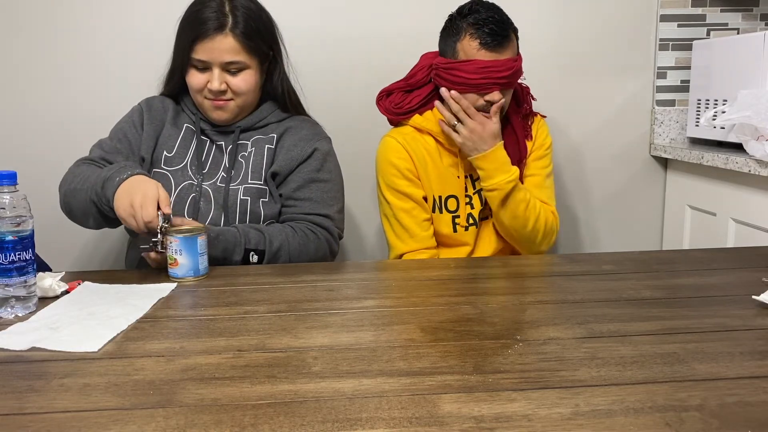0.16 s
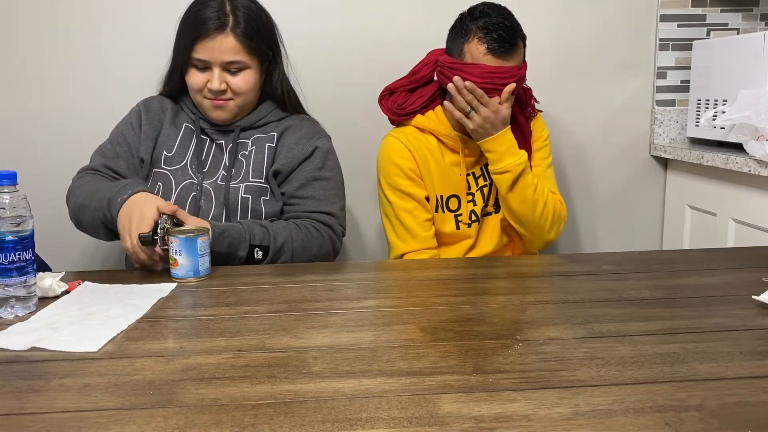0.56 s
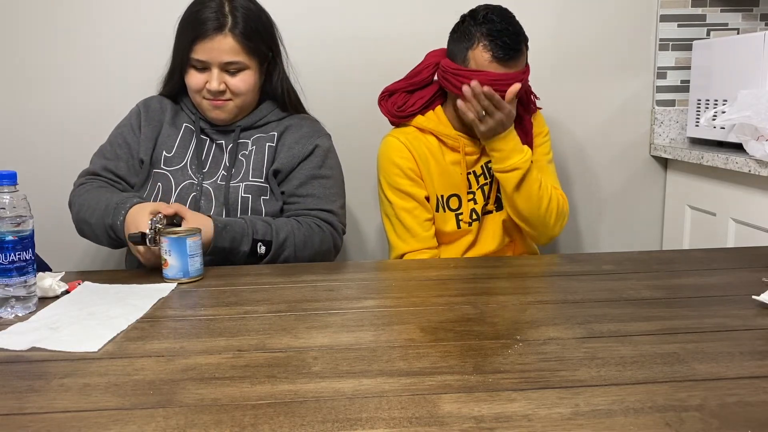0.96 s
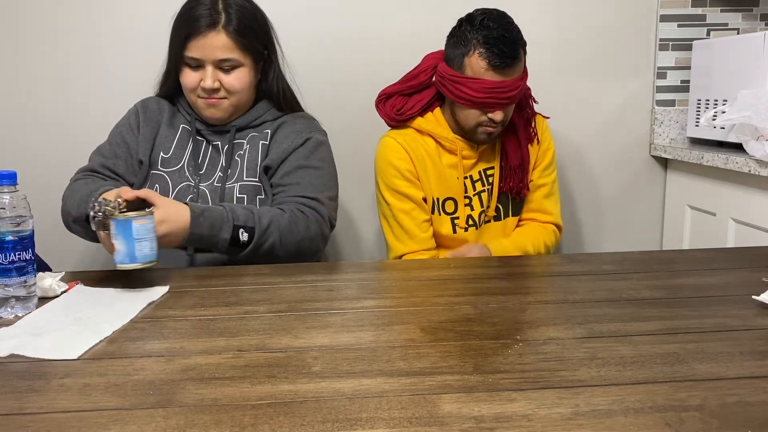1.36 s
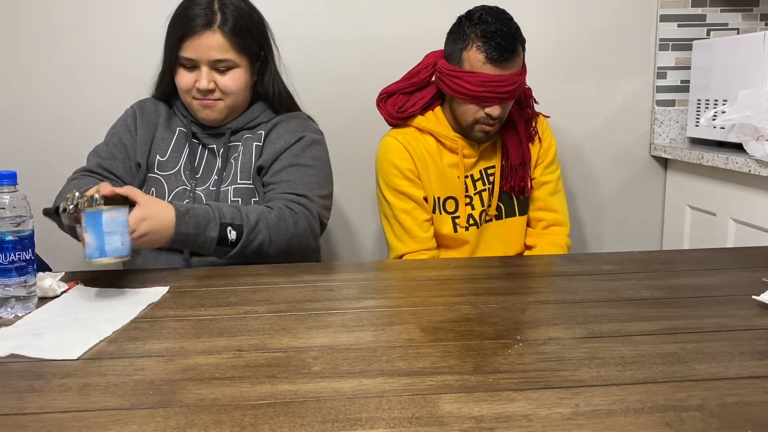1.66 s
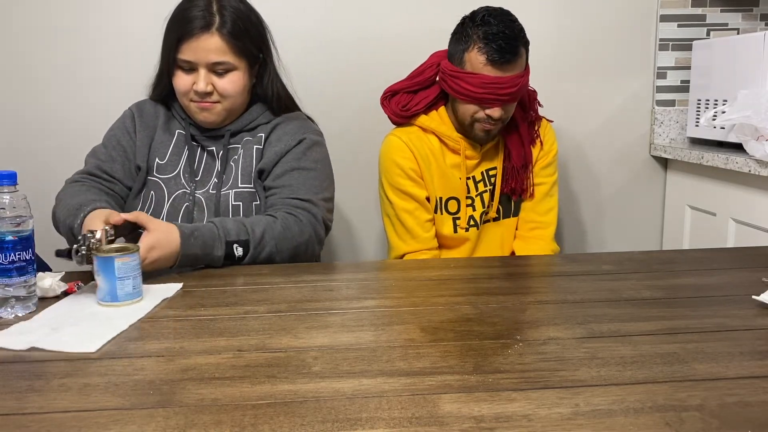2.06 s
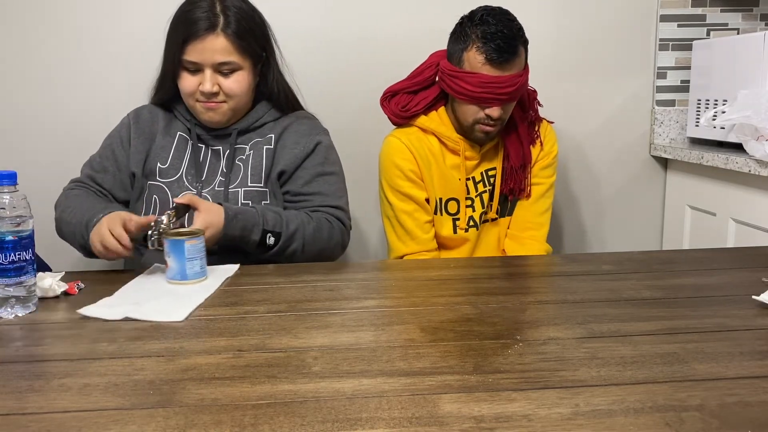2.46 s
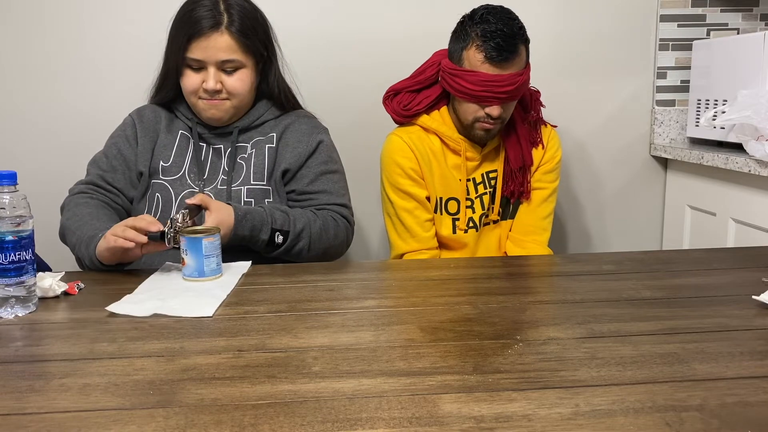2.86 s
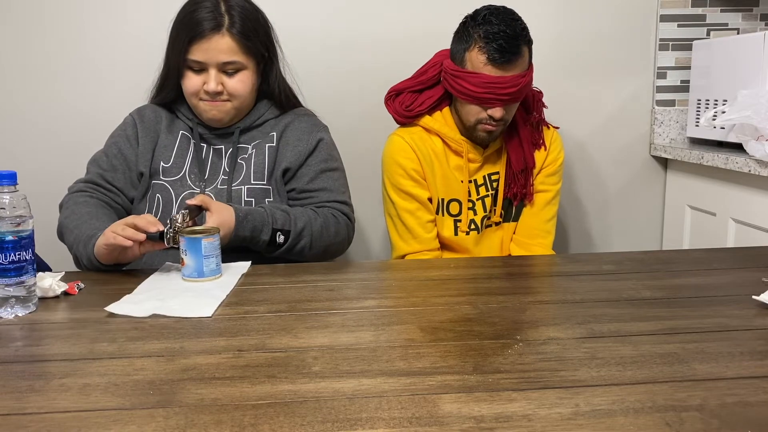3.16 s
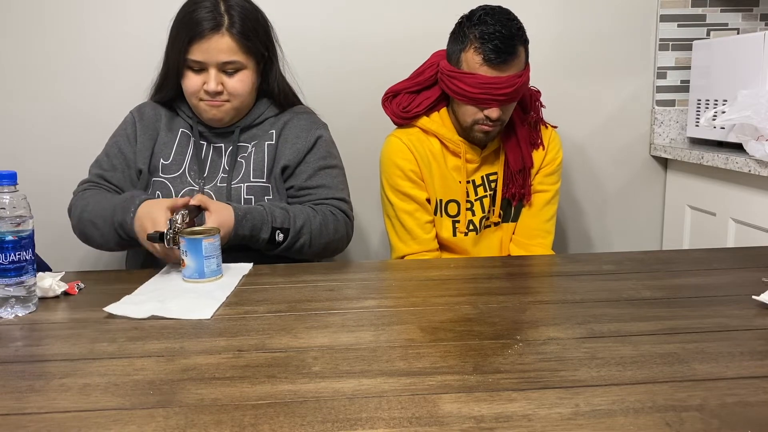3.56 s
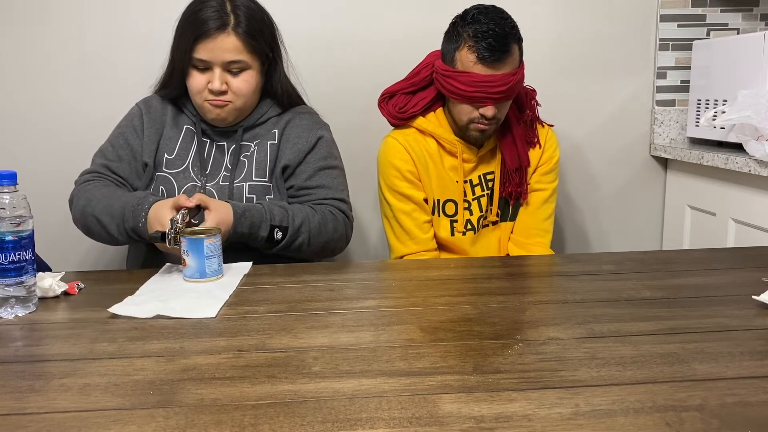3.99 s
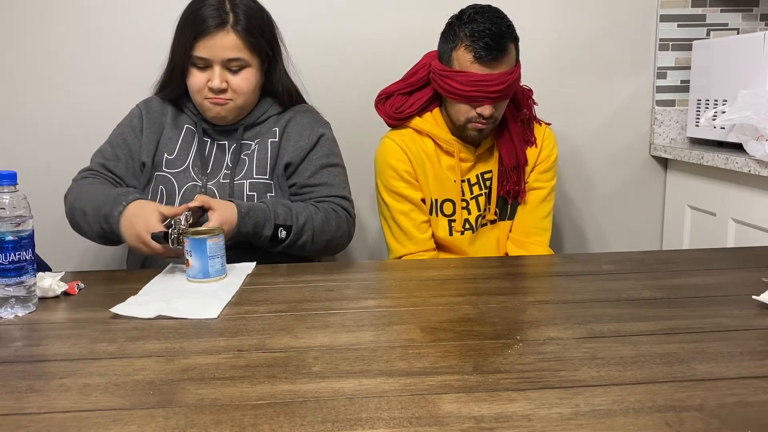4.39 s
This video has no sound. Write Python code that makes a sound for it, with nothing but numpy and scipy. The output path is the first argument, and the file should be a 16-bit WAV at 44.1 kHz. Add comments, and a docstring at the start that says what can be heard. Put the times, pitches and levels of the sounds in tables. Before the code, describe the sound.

A hard-walled kitchen, heard in stereo by a phone across a wooden table, has a steady low appliance hum near 120 Hz and soft bassy room noise. At 0 to 0.05 s a metallic clunk and dull shuffle come from left of centre; weaker wooden knocks follow at 0.3, 0.45 and 0.57 s, with brief hand rubbing. Around 1.2 to 1.55 s paper and hands rustle brightly. Tiny ticks at 1.6 to 1.77 s precede a heavy, low thud of the tin on the table at 1.88 to 1.92 s, several contacts run together. Soft sliding continues to 2.7 s, with small dry ticks at 2.34 and 2.7 s, then near quiet. Faint ticks come at 3.35 s, crisp little clicks at 3.53 to 3.58 s, and a soft deep push at 3.63 s. At 4.09 s the loudest metallic snap cracks, knocks the wood and rings briefly with kitchen echoes. Light handling rustles at 4.35 to 4.5 s.

```python
"""In a hard-walled kitchen a hand-cranked opener works on a small tin on a wooden table.
Two microphones of a phone listen from across the table; knocks and ticks come from left of centre.
Knocks ring modes of table and tin and add short noise bursts; small parts tick as dying sines.
Paper, hands and a dull shuffle are shaped noise; an appliance hums in wavering tones under room noise.
One soft push sways the table with deep rumble, and decaying stereo noise serves as the echoes."""
import sys
import numpy as np
from scipy import signal
from scipy.io import wavfile

SR = 44100
rng = np.random.default_rng(int(sys.argv[2]) if len(sys.argv) > 2 else 0)


def master_out(mix):
    """Clip the mix to full scale and print it as 16-bit PCM to the path in sys.argv[1]."""
    frames = np.transpose(np.atleast_2d(mix))
    ceiling = np.clip(frames, -1, 1)
    pcm = np.round(ceiling * 32767).astype(np.int16)
    wavfile.write(sys.argv[1], SR, pcm)


def rack_gain(trim_db):
    """Turn a fader trim in dB into the linear factor to multiply a signal by."""
    fader = np.asarray(trim_db, float)
    return 10 ** (fader / 20)


N = 199847   # length [samples]


def rms_one(x):
    """Scale to unit rms."""
    return x / np.sqrt(np.mean(x ** 2) + 1e-20)


def at_hz(points, hz, axis=1):
    """Read one column of a table on a log-frequency scale."""
    table = np.array(points)
    return np.interp(np.log(hz), np.log(table[:, 0]), table[:, axis])


def butter(x, hz, kind, order=2):
    """Causal Butterworth filter."""
    return signal.sosfilt(signal.butter(order, hz, kind, fs=SR, output="sos"), x)


def drift(rate_hz):
    """Slow random wander of spread 1: noise through two equal poles, computed every 40 samples."""
    pole = np.exp(-80 * np.pi * rate_hz / SR)
    noise = rng.standard_normal(N // 40 + 2002)
    slow = signal.lfilter([1], [1, -2 * pole, pole * pole], noise)[2000:]   # settled part only
    return np.interp(np.arange(N) / 40, np.arange(len(slow)), rms_one(slow))


def ring(clicks, hz, t60_s):
    """A unit click sets a sine of height 1 ringing, as a damped resonance does."""
    decay, turn = rack_gain(-60 / (t60_s * SR)), 2 * np.pi * hz / SR
    poles = [1, -2 * decay * np.cos(turn), decay * decay]
    return signal.lfilter([0, np.sin(turn)], poles, clicks + 1e-18)


def struck(modes, s, strength_db, damping, spread_db, tilt_db=0):
    """Each blow strikes every mode with a strength of its own; tilt_db per octave brightens it."""
    at, out = np.round(s * SR).astype(int), np.zeros(N)
    chance = rng.standard_normal((len(at), len(modes)))
    for k, (hz, level_db, t60_s) in enumerate(modes):
        clicks = np.zeros(N)
        octaves = np.log2(hz / 2500)
        blow_db = strength_db + level_db + tilt_db * octaves + spread_db * chance[:, k]
        np.add.at(clicks, at, rack_gain(blow_db))
        out += ring(clicks, hz, damping * t60_s)   # damping scales the ring time
    return out


# Half-octave band edges: (frequency [Hz])
BAND_EDGES = 25 * 2 ** np.arange(0, 9.6, .5)
# Left-right likeness of diffuse sound at the two microphones: (frequency [Hz], likeness [0 to 1])
MIC_LIKENESS = [(60, 0.97), (150, 0.89), (300, 0.45), (600, 0), (1650, 0.026), (15000, 0.13)]


def stereo_bands(size, closeness):
    """Half-octave bands of stereo noise; closeness pulls a near source to the middle."""
    white = rng.standard_normal((2, 2, size))
    for k, (low, high) in enumerate(zip(BAND_EDGES, BAND_EDGES[1:])):
        mid, side = butter(white[k % 2], [low, high], "band")   # neighbouring bands differ in noise
        hz = np.sqrt(low * high)
        alike = np.clip(at_hz(MIC_LIKENESS, hz), 0, 1)
        alike += np.clip(closeness, 0, 1) * (1 - alike)
        yield hz, np.sqrt(1 + alike) * mid + np.sqrt(1 - alike) * side * [[1], [-1]]


def coloured(spectrum, closeness):
    """Stereo noise with a spectrum, silent outside it; rms 1."""
    low, high = spectrum[0][0], spectrum[-1][0]
    bands = stereo_bands(N, closeness)
    return rms_one(sum(rack_gain(at_hz(spectrum, hz)) * band for hz, band in bands if low <= hz <= high))


def from_left(x, pan_db):
    """A source left of centre: louder on the left and one sample late on the right."""
    return np.array([x, np.roll(x, 1)]) * rack_gain([[pan_db / 2], [-pan_db / 2]])


# Colour of the room noise: (frequency [Hz], relative level [dB per Hz])
ROOM_COLOUR = [(15, -50), (25, -1), (123, -2), (145, -13.5), (242, -10.5), (326, -14.5), (363, -14.5),
               (775, -22), (1040, -28), (1610, -72), (2410, -34), (3340, -54.5), (16000, -65.5)]


def room_noise():
    """Steady diffuse noise fills the kitchen, weighted towards the bass."""
    level_db = -56.5   # rms at the microphones, before their response
    return rack_gain(level_db) * coloured(ROOM_COLOUR, closeness=0)


# Tones of the appliance: (frequency [Hz], level before the waver [dB rms])
HUM_TONES = [(118.4, -59), (242.2, -73.5), (279.9, -82), (360.7, -67.5)]


def hum(waver_db, phase_spread_rad):
    """An appliance hums in low tones, each wavering in level and phase."""
    t, out = np.arange(N) / SR, 0
    for hz, level_db in HUM_TONES:
        height = np.sqrt(2) * rack_gain(level_db + waver_db * drift(11.0))
        phase = phase_spread_rad * drift(2.2)
        out = out + height * np.sin(2 * np.pi * hz * t + phase)
    return out


# Strokes across the table, levels at mid-stroke:
# (start [s], length [s], paper [dB], hands [dB], dull shuffle [dB])
TABLE_STROKES = [(-.05, 0.15, -105, -93, -47), (0.16, 0.41, -86, -108, -56.5),
                 (0.541, 0.15, -88, -71.5, -55), (0.837, 0.18, -93, -90, -61.5),
                 (1.172, .39, -59, -59, -61), (1.7, 0.12, -75.5, -93, -85.5), (1.91, 0.75, -68, -79, -67.5),
                 (2.65, 0.19, -74.5, -80, -68), (3.286, 0.16, -73, -73, -68),
                 (3.508, 0.14, -72, -63, -60.5), (4.326, 0.21, -73, -72, -63)]
# Floor under the strokes: (paper [dB], hands [dB], shuffle [dB])
REST_LEVELS = (-97, -91.5, -70)
# Start and end of a stroke against its middle: (paper [dB], hands [dB], shuffle [dB])
STROKE_ARCH = (-11, -13, -2)


def strokes():
    """Gains of paper, hands and shuffle: each stroke starts, swells in the middle, stops and fades."""
    rise_s, fade_t60_s = 0.052, 0.18
    t = np.arange(N) / SR
    gains = rack_gain(np.array(REST_LEVELS))[:, None] * np.ones(N)
    for s, length_s, *levels_db in TABLE_STROKES:
        off_middle = (2 * np.clip((t - s) / length_s, 0, 1) - 1) ** 2
        fade_db = -60 * np.maximum(t - s - length_s, 0) / fade_t60_s
        start = np.clip((t - s) / rise_s, 0, 1) ** 2
        stroke_db = np.array(levels_db)[:, None] + np.outer(STROKE_ARCH, off_middle) + fade_db
        gains = gains + rack_gain(stroke_db) * start
    return gains


def grain(rate_hz, depth_db):
    """Friction catches and lets go: an uneven gain of rms 1."""
    return rms_one(rack_gain(depth_db * drift(rate_hz)))


# Colour of sliding paper: (frequency [Hz], relative level [dB per Hz])
PAPER_COLOUR = [(4000, -20), (5500, -23), (7500, -12.5), (10500, -8.5), (14500, -9), (18000, -6.5)]


def paper_slides(gain):
    """Sliding paper gives bright friction noise with a fine, uneven grain."""
    return gain * grain(60, depth_db=1.2) * coloured(PAPER_COLOUR, closeness=0.14)


# Colour of rubbing hands: (frequency [Hz], relative level [dB per Hz])
HANDS_COLOUR = [(900, -2.5), (1800, -14.5), (3000, 6.5), (4500, -1.5), (6500, 1.5), (9000, -15)]


def hands_rub(gain):
    """Rubbing hands give friction noise from the middle range up, closer to the centre than paper."""
    return gain * grain(58, depth_db=1.0) * coloured(HANDS_COLOUR, closeness=0.5)


# Colour of the shuffle on wood: (frequency [Hz], relative level [dB per Hz])
WOOD_COLOUR = [(120, 0.5), (300, 12), (600, -0.5), (1200, -3), (2000, -8.5), (3500, -17.5)]


def wood_shuffle(gain):
    """A shuffle on the wood gives dull friction noise that catches more slowly."""
    return gain * grain(30, depth_db=1.5) * coloured(WOOD_COLOUR, closeness=0.106)


def bursts(s, level_db, decay_s):
    """A dying puff of noise at each knock, made of random signs; decay_s is its time constant."""
    clicks = np.zeros(N)
    jolts = rng.choice([-1., 1.], N)
    clicks[np.round(s * SR).astype(int)] = rack_gain(level_db)
    fall = np.exp(-1 / (decay_s * SR))
    return signal.lfilter([1], [1, -fall], clicks + 1e-18) * jolts


# Knocks: (time [s], force on the table [dB], hardness on wood: upper against lower modes [dB],
# metal contact [dB], sharpness of the metal edge against the contact [dB])
KNOCK_BLOWS = [(0.002, -55, 20.5, -46, -10), (0.043, -30.5, 1, -34.5, -15), (0.315, -37.5, -5, -50, -16),
               (0.454, -33.5, -7, -52.5, -42), (0.464, -38, 0, -77, -30), (0.573, -46, -8, -48.5, -40),
               (1.876, -14, -4, -46, -18), (1.882, -18, -2, -47.5, -11.5), (1.889, -22, -4, -43.5, -16),
               (1.923, -22.5, -16.5, -55, -18), (3.092, -49.5, -22, -74, -30),
               (3.532, -38, -22, -55.5, 13.5), (3.548, -47.5, -22, -67, 11), (3.58, -46.5, -9, -52.5, 3),
               (4.0891, -18.5, 3, -10.5, -0.5), (4.094, -13.5, -14, -18, -14)]
# Modes of the table top, low ones first: (frequency [Hz], relative level [dB], t60 before damping [s])
TABLE_MODES = [(129.4, -11, 1.57), (180.6, -2.5, 0.66), (301, -7.5, 0.23), (368.8, -12.5, 0.4),
               (583, 3, 0.015), (642, -30.5, 0.45), (908, -26, 0.2), (870, -27, 2.3), (1040, -21, 0.63),
               (1134, -35, 0.44), (1200, -6.5, 0.05)]
# Modes of the tin: (frequency [Hz], level before the tilt [dB], t60 before damping [s])
TIN_MODES = [(1287, -14, .15), (1512, -9, .25), (1527, -8, .33), (1557, -4, .33), (1640, -9, .15),
             (1683, 0, .24), (1702, -9, .3), (1808, -12, .22), (2312, -19, .3), (2505, -20, .25),
             (2688, -12, .14), (2760, -17, .15), (2897, -17, .25), (2970, -18, .22), (3297, -19, .25),
             (3865, -23, .25), (4193, -21, .2), (5060, -28, .25), (6266, -33, .25), (6718, -30, .2),
             (7660, -26, .12)]
# The cutter pops through the lid and the tin rings: (time [s], relative level [dB])
CUTTER_POP = (4.0892, -24)


def knocks():
    """The wood (modes, dull thump), the contact (clank, bright crack) and the ringing tin."""
    s, low_db, hardness_db, clank_db, edge_db = np.transpose(KNOCK_BLOWS)
    high_db, crack_db = low_db + hardness_db, clank_db + edge_db
    tin_db = clank_db - 18.5   # the hand-held tin rings below the metal contact

    low = struck(TABLE_MODES[:4], s, low_db - 13.5, damping=0.5, spread_db=6.0)
    low += butter(bursts(s, low_db + 14, decay_s=0.0064), [90, 400], "band")
    high = struck(TABLE_MODES[4:], s, high_db + 5.0, damping=0.12, spread_db=5.0)
    high += butter(bursts(s, high_db + 3.5, decay_s=0.0083), [400, 1350], "band")
    wood = butter(low + high, 1297, "low", order=3)   # a soft contact excites no treble

    clank = butter(bursts(s, clank_db + 0.5, decay_s=0.003), [1700, 3700], "band")
    crack = butter(bursts(s, crack_db + 6.5, decay_s=0.00057), 7570, "high", order=2)

    pop_s, pop_db = CUTTER_POP
    tin = struck(TIN_MODES, np.append(s, pop_s), np.append(tin_db, pop_db),
                 damping=.85, spread_db=1.5, tilt_db=-4)
    return wood, clank, crack, tin


# Ticks of small parts damped by the hand: (time [s], relative level [dB], pitch [Hz])
SMALL_TICKS = [(0.045, -32.5, 6000), (0.876, -51, 13400), (1.625, -46, 1320), (1.645, -62, 3600),
               (1.683, -46.5, 14900), (1.7523, -54, 15000), (1.754, -48, 9600), (1.766, -51, 3460),
               (2.337, -43, 3140), (2.345, -49.5, 4370), (2.689, -58, 1060), (2.702, -49, 2900),
               (2.72, -51.5, 3000), (2.74, -56, 2760), (2.785, -59, 7060), (3.337, -56, 6770),
               (3.41, -55.5, 2510)]
# Faint metallic clinks, one just before the loud snap:
# (time [s], relative level [dB], brightness [dB per octave])
FAINT_CLINKS = [(0.045, -52.5, 0.5), (3.5309, -53, 6), (4.075, -59.5, -3.5)]
# Modes of the clinks: (frequency [Hz], level before the brightness [dB], t60 [s])
CLINK_MODES = [(1298, 0, 0.18), (1820, -12, 0.15), (2373, 2.5, 0.097), (2627, 3.5, 0.03), (2805, -2, 0.067),
               (4200, -9, 0.039), (6320, -9, 0.033), (9600, -6, 0.0115)]


def ticks(snap_db):
    """Each tick is a sharp click that rings briefly at its pitch and one overtone; clinks ring in modes."""
    cycles_to_die = 21   # cycles of the pitch to fall by 60 dB
    overtone, overtone_db = 2.3, -16.5   # pitch ratio, level against the pitch
    when, clink_db, tilt_db = np.transpose(FAINT_CLINKS)
    out = struck(CLINK_MODES, when, clink_db, damping=1, spread_db=0, tilt_db=tilt_db)
    t = np.arange(SR // 5) / SR
    for s, level_db, hz in SMALL_TICKS:
        upper_hz = overtone * hz
        upper = rack_gain(overtone_db) * np.sin(2 * np.pi * upper_hz * t) * (upper_hz < SR / 2)
        shape = (np.sin(2 * np.pi * hz * t) + upper) * rack_gain(-60 * t * hz / cycles_to_die)
        shape[:2] += rack_gain(snap_db) * np.array([1, -1])
        at = round(s * SR)
        out[at:at + len(t)] += rack_gain(level_db) * shape
    return out


# Echoes of the kitchen: (frequency [Hz], t60 [s], relative level [dB])
KITCHEN_ECHOES = [(48.3, 0.94, 11), (93.7, 0.29, -5.5), (200, 0.34, -3), (470, 0.48, 0), (1550, 0.47, 4.5),
                  (3730, 0.44, 4.5), (8260, 0.4, 5.5), (14000, 0.21, 6)]


def kitchen(x, first_echo_s):
    """Diffuse reflections: stereo noise that dies band by band, of unit energy at 0 dB."""
    t, echoes = np.arange(SR) / SR, 0
    for hz, band in stereo_bands(SR, closeness=0):
        t60_s = at_hz(KITCHEN_ECHOES, hz)
        level_db = at_hz(KITCHEN_ECHOES, hz, axis=2)
        echoes = echoes + band * rack_gain(level_db - 60 * t / t60_s) / np.sqrt(t60_s)
    onset = np.clip(t / first_echo_s - 1, 0, 1)   # silent at first, full at twice first_echo_s
    echoes *= onset * np.sqrt(6 * np.log(10) / SR)
    return signal.fftconvolve(x[None], echoes, axes=1)[:, :N]


# A soft push on the table: (time of the middle [s], spread of the swell [s], level before the low cut [dB])
TABLE_PUSH = (3.63, .05, -56)


def push():
    """The table sways: a bell-shaped swell of deep rumble."""
    s, rise_s, level_db = TABLE_PUSH
    swell = np.exp(-.5 * ((np.arange(N) / SR - s) / rise_s) ** 2)
    rumble = rms_one(butter(rng.standard_normal(N), [35, 60], "band"))
    return rack_gain(level_db) * swell * rumble


def scene():
    """Knocks and ticks left of centre with their room, friction noises, hum and room noise."""
    background = room_noise() + hum(waver_db=0.5, phase_spread_rad=0.58)
    sliding, rubbing, shuffling = strokes()
    paper = paper_slides(sliding)
    friction = hands_rub(rubbing) + wood_shuffle(shuffling)
    wood, clank, crack, tin = knocks()
    small = ticks(snap_db=-11)

    # near sources: wood and friction lean left in level only
    near = wood * rack_gain([[.7], [-.7]]) + friction * rack_gain([[.6], [-.6]])
    near = near + from_left(clank + tin + small, pan_db=7) + from_left(rack_gain(0.5) * crack, pan_db=.3)

    # what each source sends into the room
    sent = rack_gain(0.6) * (wood + clank) + rack_gain(-11.5) * crack + rack_gain(-5.5) * tin + rack_gain(-7.5) * small
    echoes = kitchen(sent, first_echo_s=0.00065)
    return near + paper + echoes + push() + background


def roll_off(x):
    """The treble ends steeply here."""
    return signal.sosfilt(signal.butter(12, 16830, fs=SR, output="sos"), x)


# Two dips in the treble: (lower edge [Hz], upper edge [Hz])
TREBLE_DIPS = [(8050, 9050), (11200, 13200)]
# Peak above the dips: (frequency [Hz], width [Hz], lift before the treble cut [dB])
TREBLE_PEAK = (14600, 2400, 7)


def record(dry):
    """Two dips are cut into the treble, with a peak above them; both ends of the spectrum are cut."""
    x = butter(dry, 52.7, "high", order=3)
    for edges in TREBLE_DIPS:
        x = butter(x, edges, "bandstop", order=2)
    hz, width_hz, lift_db = TREBLE_PEAK
    peak = butter(x, [hz - width_hz / 2, hz + width_hz / 2], "band", order=1)
    x = x + (rack_gain(lift_db) - 1) * peak
    x = butter(x, 14800, "low", order=4)
    steep_cut = signal.cheby2(12, 70, 16600, fs=SR, output="sos")   # 70 dB down from 16600 Hz
    mix = signal.sosfilt(steep_cut, x)
    return roll_off(mix)


dry = scene()
out = record(dry)
master_out(out)
```